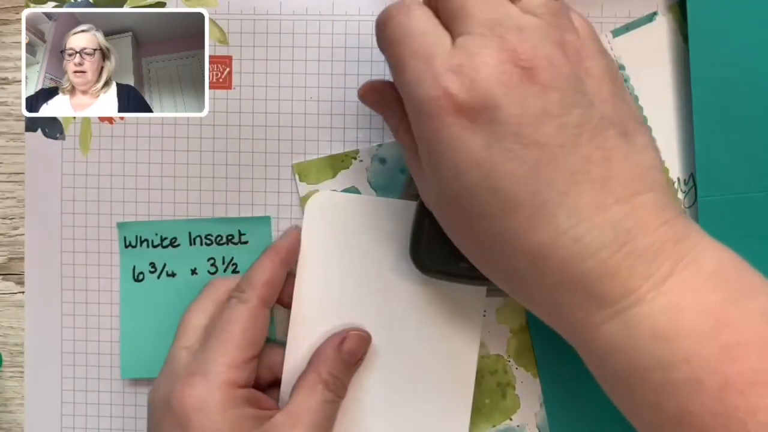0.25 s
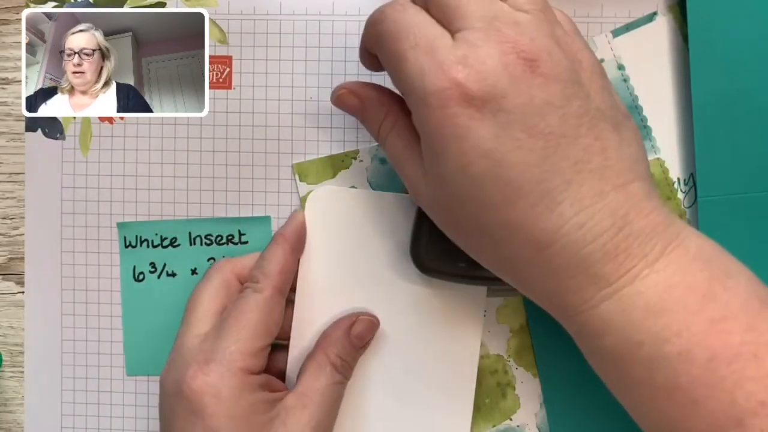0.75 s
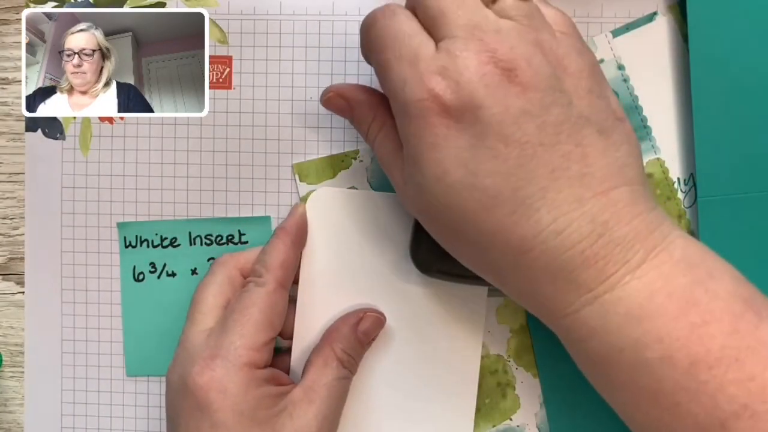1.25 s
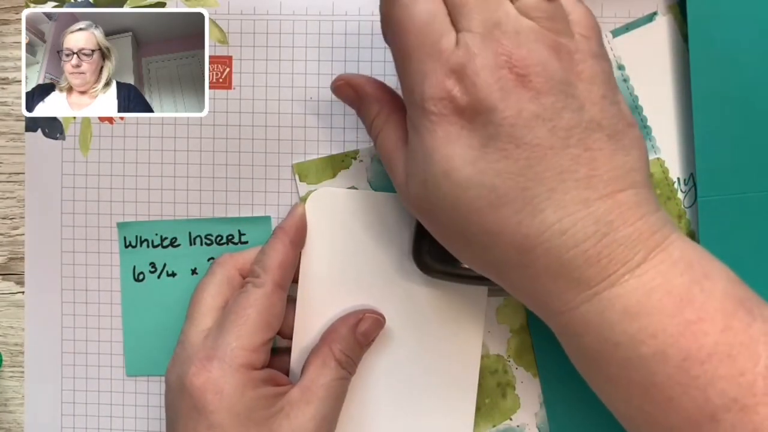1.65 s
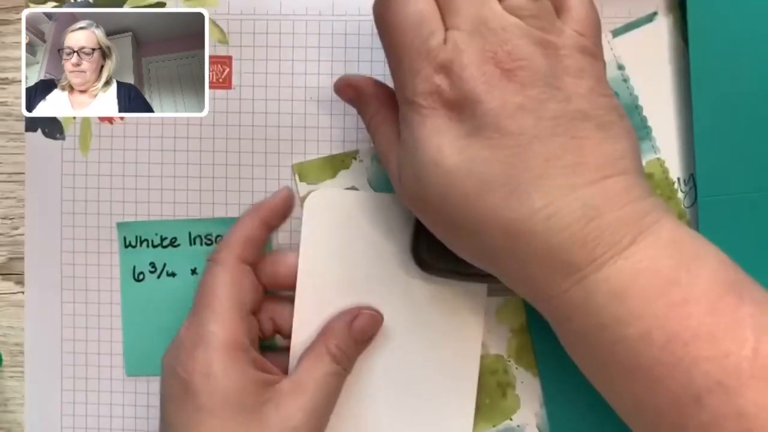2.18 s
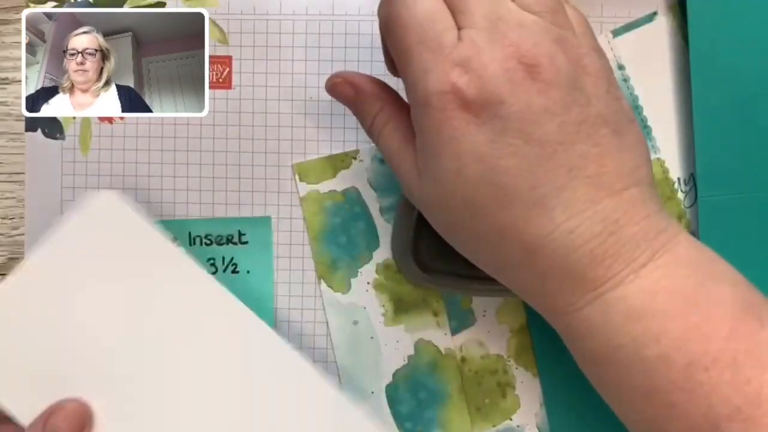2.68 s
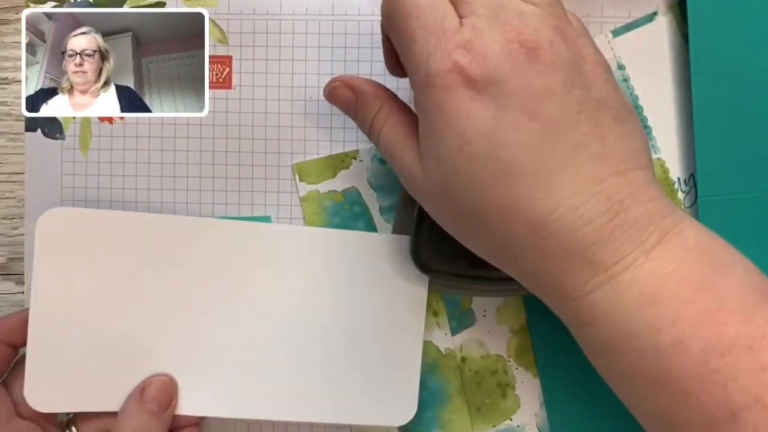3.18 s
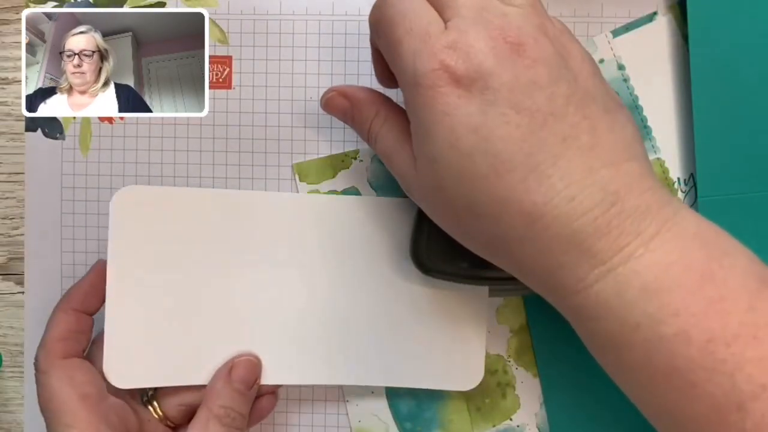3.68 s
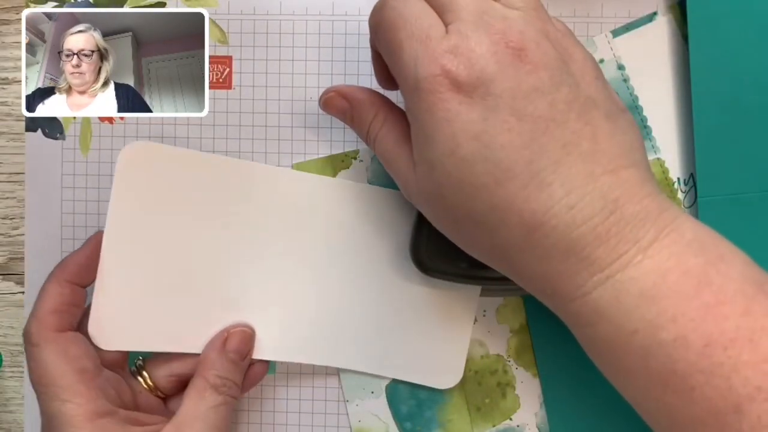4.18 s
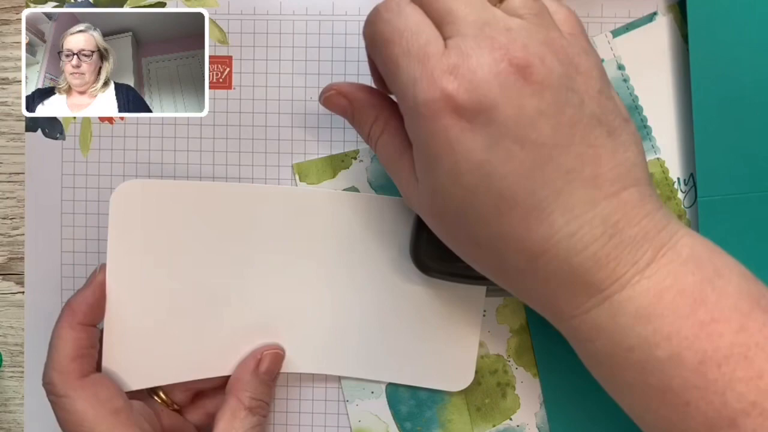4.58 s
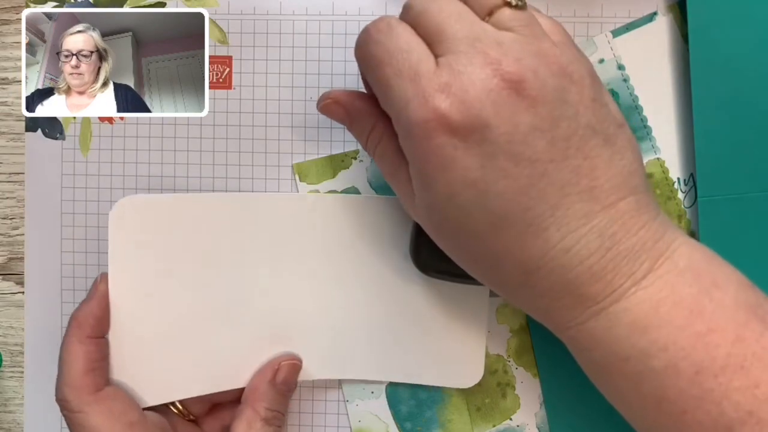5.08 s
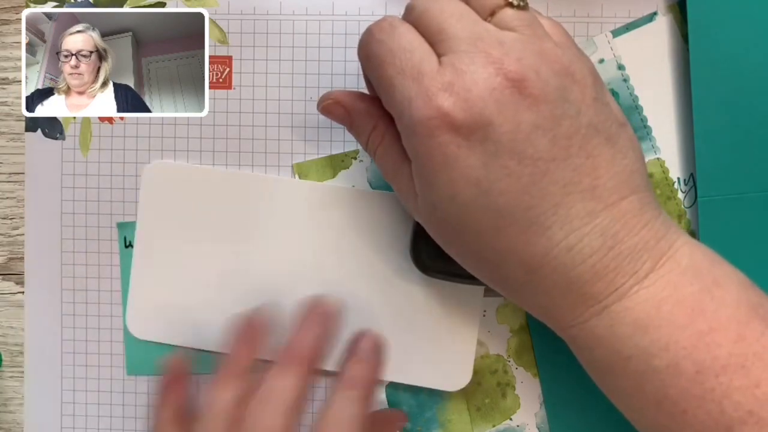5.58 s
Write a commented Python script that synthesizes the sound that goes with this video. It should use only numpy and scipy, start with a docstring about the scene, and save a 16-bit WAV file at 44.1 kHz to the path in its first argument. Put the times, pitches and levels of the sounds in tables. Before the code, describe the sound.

A corner punch snaps hard through card on a desk, then the card rustles, clicks into place again and is let go.

```python
"""A hand corner punch snaps through card stock on a craft table, heard close up in a small quiet room.
Base, shell and die ring as decaying sines with noisy cracks; the table thuds and hums on.
Stick-slip jerks make the lever creak around the cut; damped noise knocks make its ticks and the card's taps.
The card is drawn out and turned as grainy filtered noise, clicks into the slot for the next corner,
then slides and is let go with a falling scrape. Knocks get a short echo, over a steady hush."""
import sys
import numpy as np
from scipy import signal
from scipy.fft import rfft, irfft, next_fast_len
from scipy.io import wavfile
from scipy.ndimage import uniform_filter1d

SR = 44100
rng = np.random.default_rng(int(sys.argv[2]) if len(sys.argv) > 2 else 0)


def pcm_store(signal):
    """Save signal as 16-bit PCM."""
    levels = np.round(np.clip(np.atleast_2d(signal), -1, 1) * 32767)
    wavfile.write(sys.argv[1], SR, levels.astype(np.int16).T)


N = 257588
TIME = np.arange(N) / SR  # seconds
TOP_HZ = 15900  # upper limit of the whole sound

# the snap: cracking card, breakthrough, blade on its stop
# (t/s, base level/dB, plastic shell level/dB, steel level/dB, crack level/dB, crack t60/s)
SNAP_STAGES = [(1.788, -42.5, -27, -58.5, -30.5, 0.013), (1.7917, 0.5, -23.5, -50, -30, 0.0043),
               (1.7928, -37.5, -18, -38, -20, .014), (1.7959, -38.5, -12.5, -33.5, -15.5, .008),
               (1.7967, -7, -25.5, -42, -22.5, 0.009), (1.8097, -43, -33.5, -30.5, -14.5, 0.015),
               (1.8109, -11, -25.5, -24.5, -18.5, 0.014), (1.8144, -16.5, -31.5, -36, -26, 0.018)]
# modes of the punch on its mat, its shell, its steel die and the table top (f/Hz, level/dB, t60/s)
BASE_MODES = [(163.6, -13.5, 0.11), (192.5, -8, .15), (192.65, -6.5, 0.17), (254, -6, 0.11),
              (322.7, -5, 0.1), (392.3, -19, 0.14), (494, -15, 0.13), (470, -23, 0.054)]
SHELL_MODES = [(694, -0.5, 0.039), (960, -5.5, 0.015), (1384, -4.5, 0.039), (1502, -7, .05),
               (1770, -6, 0.072), (2150, -6.5, .025), (2956, -3.5, 0.026), (3160, -11.5, .03),
               (4450, -13, 0.018)]
STEEL_MODES = [(538, -3.5, 0.1), (788, -3, .1), (835, -5.5, 0.13), (905, -2, 0.061), (950, -16, .42),
               (1082, -15.5, 0.21), (1460, -6.5, 0.066), (1553, -10.5, .09), (2150, -16, .1),
               (3920, -4, 0.052), (3910, -10.5, 0.05), (6331.5, -1, 0.036), (6481, -12, .08),
               (6940, -14, .09), (6600, -11, 0.028)]
TABLE_MODES = [(71.5, -27, .24), (75, -20, 0.06), (106.4, 2.5, 0.079), (120.79, -7, 0.038)]
# the table takes the weight of the hand or the card (t/s, level/dB)
TABLE_THUMPS = [(1.197, -42.5), (1.2158, -52), (1.8058, -16.5), (1.8229, -8.5), (1.8983, -29.5),
                (2.133, -64), (2.19, -43.5), (2.385, -41.5), (3.788, -40), (4.727, -52.5), (5.31, -51),
                (5.366, -42.5)]
# cracking card (f/Hz, level per Hz/dB)
CRACK_SPECTRUM = [(300, -10), (700, 4.5), (1300, 0), (2000, 2), (3000, -1.5), (3900, 0.5), (5000, -3),
                  (6500, 0), (8000, -1), (10500, -2.5), (13500, -9), (16000, -13)]
# low, faint modes of the loaded table (f/Hz, level/dB, t60/s)
AFTER_MODES = [(69, -59.5, 6.2), (99, -55.5, 4.8), (320, -55.5, 3.3)]
HUM_HZ, BEAT_HZ = 204.2, 2.27

# the punch creaks as its load shifts: palm settles, lever is pressed, recoils, is let up
# (start t/s, hold/s, groan level/dB, crackle level/dB)
CREAK_EVENTS = [(1.284, 0.036, -51, -71), (1.51, .015, -56.5, -61), (1.54, .08, -59, -70.5),
                (1.651, 0.11, -40, -47), (1.838, 0.017, -37, -44.5), (1.92, .03, -50.5, -60.5),
                (1.98, 0.11, -59.5, -64), (2.141, 0.0066, -41, -53), (2.197, 0.013, -44.5, -53),
                (2.363, .015, -49, -53.5), (2.722, 0.053, -63, -68)]
CREAK_ATTACK_S, CREAK_RELEASE_S = 0.022, 0.037  # time constants
# the base groaning on its mat, then the crackling hinge (f/Hz, level per Hz/dB)
GROAN_SPECTRUM = [(55, -16.5), (100, -9), (140, -4.5), (190, -3.5), (275, 1), (380, -11.5), (520, -17),
                  (900, -50)]
CRACKLE_SPECTRUM = [(300, -21), (450, -1.5), (580, 3.5), (680, -4), (830, 6.5), (1050, -11), (1500, -10),
                    (2200, -16.5), (3800, -24), (5500, -46)]

# the card corner meets the guide, then seats against the die
# (t/s, corner level/dB, guide level/dB, crack level/dB, crack t60/s)
SEATING_CONTACTS = [(3.695, -26, -73, -52, 0.0066), (3.6964, -34.5, -73.5, -57.5, .008),
                    (3.6966, -32.5, -74.5, -57, 0.013), (3.7759, -59.5, -54, -30.5, 0.011),
                    (3.776, -23.5, -43, -24, 0.02)]
# modes of the card corner and of the guide in the die (f/Hz, level/dB, t60/s)
CORNER_MODES = [(509, -25, 0.0258), (1020, -16, 0.011), (1900, -6, 0.013), (2150, 1, 0.006),
                (2800, 2.5, 0.0038), (3550, 0, 0.0041), (4117, 0, 0.008), (4200, -38.5, 0.071),
                (4640, -8, 0.0052), (5700, -17.5, 0.0087)]
GUIDE_MODES = [(333, -3, 0.04), (2780, 5.5, 0.046), (3110, 21.5, 0.0058), (3700, 18, 0.019),
               (3450, -4.5, 0.11), (3450, -2, 0.097), (3620, -12, .09), (3690, 2, 0.14), (7000, 0.5, 0.071),
               (7900, -1.5, 0.11), (8500, -8.5, .06), (9000, -8, 0.098)]

# ticks of the lever and its hinge; a higher tilt sounds harder (t/s, level/dB, tilt/dB per octave)
LEVER_TICK_EVENTS = [(0.5323, -50, 4), (0.5613, -55, 0), (1.2584, -47.5, 4), (1.297, -59, -4),
                     (1.4762, -53.5, -3), (1.4928, -59, -5), (1.5059, -54, -5.5), (1.5957, -44, -2.5),
                     (1.626, -45, -3.5), (1.654, -48, -10), (1.689, -42.5, 1), (1.72, -44.5, -5.5),
                     (1.7498, -38, 4.5), (2.0075, -42, -4), (2.0309, -52.5, -3), (2.1862, -39, 1.6),
                     (2.214, -47.5, 5), (2.293, -48, 8)]
# taps of the card against punch, fingers and table (t/s, level/dB, tilt/dB per octave)
CARD_TAP_EVENTS = [(1.4484, -65, 3), (2.3741, -58.5, 4), (2.3816, -50, -6), (2.42, -58.5, -12),
                   (2.7217, -60.5, -7.5), (2.7567, -61.5, 3.5), (3.0313, -61.5, -6.5), (3.464, -59, -5),
                   (4.438, -65.5, 2), (4.7154, -59, 2), (5.0283, -62.5, 0.5), (5.3039, -55.5, -1.5),
                   (5.3316, -49, -1.5), (5.3661, -45, -1), (5.4536, -66, 3.5)]
# the bands in which a knock rings (low f/Hz, high f/Hz)
KNOCK_BANDS = [(170, 450), (640, 1120), (1250, 3200), (4000, 11000)]
# how lever and card answer a knock, one row per band (relative level/dB, t60/s)
LEVER_ANSWER = [(-9.5, .081), (0.5, 0.022), (-6.5, .014), (-28.5, .01)]
CARD_ANSWER = [(-7, 0.092), (0.06, 0.036), (-1, 0.016), (-7.5, 0.015)]
TILT_PIVOT_HZ = 850

# strokes of the card: lined up, drawn out, turned, fed in, nudged, let go, smoothed
# (start t/s, hold/s, rub level/dB, hiss level/dB), both levels before trim and flutter
CARD_STROKES = [(0, .13, -64, -69.5), (0.544, 0.032, -66.5, -67.5), (0.771, .06, -64, -75),
                (2.15, 0.089, -63, -62), (2.276, 0.087, -61, -62), (2.613, 0.034, -64.5, -62.5),
                (2.77, .03, -66, -62.5), (3.307, 0.18, -59, -65), (3.95, 0.0222, -63, -69.5),
                (4.16, 0.076, -63, -71.5), (4.425, 0.028, -63, -73.5), (4.73, 0.12, -62.5, -68),
                (5.292, 0.053, -53, -53.5), (5.387, 0.033, -51.5, -66), (5.683, .16, -67.5, -65.5)]
# time constants of a stroke at the reference level; louder is brisker, halving them every BRISK_DB
STROKE_ATTACK_S, STROKE_RELEASE_S, STROKE_REF_DB, BRISK_DB = 0.054, 0.041, -60.5, 8
# rubbing sheet, then hissing edge (f/Hz, level per Hz/dB)
RUB_SPECTRUM = [(70, -16.5), (140, 0), (280, 0), (520, -1.5), (850, -1.5), (1150, -5.5), (1500, -0.5),
                (2100, -4), (2900, -3.5), (3800, -11), (6000, -30.5)]
HISS_SPECTRUM = [(2000, -33.5), (3400, 0), (4200, -2.5), (5100, -2), (6400, -3), (8000, -2.5), (9500, -5.5),
                 (11000, -5), (13600, -8.5), (15500, -13)]
# the bent sheet scrapes off the finger and its note falls (t/s, f/Hz, level/dB)
SCRAPE_GLIDE = [(5.29, 2397, -73), (5.336, 2070, -48.5), (5.356, 1880, -76), (5.376, 1578, -41),
                (5.39, 1470, -48), (5.405, 1506, -55), (5.44, 1440, -78)]

# the room's echo; a band reaches up to the next row's edge (lower edge f/Hz, level/dB, t60/s)
ROOM_BANDS = [(60, -22.5, .4), (400, -10.5, 0.097), (1120, -7, .22), (4000, -6, .21), (8956, -4, 0.15)]
# the steady hush (f/Hz, level per Hz/dB)
HUSH_SPECTRUM = [(18, -40), (30, -15.5), (77, 1), (156, -1), (208, -1), (307, -1.5), (639, -10.5),
                 (1110, -13.5), (1720, -11.5), (2130, -15), (2830, -13.5), (4910, -17), (8720, -19.5),
                 (13600, -25.5), (15500, -34.5)]


def punch(crack, clang_db=-9, clang_t60=0.09):
    """Each stage of the cut rings base, shell and die; the table top takes its own thumps."""
    out = np.zeros(N)
    base, shell = ring(BASE_MODES), ring(SHELL_MODES)
    steel, table = ring(STEEL_MODES), ring(TABLE_MODES)
    for s, base_db, shell_db, steel_db, crack_db, crack_t60 in SNAP_STAGES:
        # the die's many high modes blur into a noisy clang
        die = steel + undb(clang_db) * burst(crack, clang_t60)
        body = undb(base_db) * base + undb(shell_db) * shell + undb(steel_db) * die
        add(out, s, body + undb(crack_db) * burst(crack, crack_t60))
    for s, db in TABLE_THUMPS:
        add(out, s, undb(db) * table)
    return out


def spring(db=-55, t60=0.58):
    """The return spring shimmers after the cut: a dying burst of mid-band noise."""
    out = np.zeros(N)
    shimmer = unit(band(rng.standard_normal(N), 900, 3800))
    add(out, SNAP_STAGES[-1][0], undb(db) * burst(shimmer, t60))
    return out


def after_ring(hum_db=-51, hum_t60=7.5):
    """The table rings on after the blow, and something springy on it hums with a slow beat."""
    t = np.maximum(TIME - SNAP_STAGES[1][0], 0)  # seconds since breakthrough
    beat = np.cos(np.pi * BEAT_HZ * t)
    hum = undb(hum_db - 60 * t / hum_t60) * np.sin(2 * np.pi * HUM_HZ * t) * beat
    table = np.zeros(N)
    for hz, db, t60 in AFTER_MODES:
        decay = np.exp(-np.log(1000) * t / t60)
        table += undb(db) * decay * np.sin(2 * np.pi * hz * t)
    return hum + table * flutter(per_s=7.5, depth_db=6.5)


def creak():
    """Loaded plastic slips in small jerks: the base groans on the mat and the hinge crackles."""
    groan_gain = crackle_gain = 0
    for s, hold, groan_db, crackle_db in CREAK_EVENTS:
        load = swell(s, hold, CREAK_ATTACK_S, CREAK_RELEASE_S)
        groan_gain = np.maximum(groan_gain, undb(groan_db) * load)
        crackle_gain = np.maximum(crackle_gain, undb(crackle_db) * load)
    groan = colour(slips(per_s=2300, spread_db=2), GROAN_SPECTRUM)
    hinge = slips(per_s=960, spread_db=0.5) + 0.44 * rng.standard_normal(N)
    crackle = colour(hinge, CRACKLE_SPECTRUM)
    return groan * groan_gain + crackle * crackle_gain


def seating(crack, low_hz=1300):
    """Two sharp clicks as the next corner enters the slot; the thin edge radiates little bass."""
    out, corner, guide = np.zeros(N), ring(CORNER_MODES), ring(GUIDE_MODES)
    edge = band(crack, low_hz, TOP_HZ)
    for s, corner_db, guide_db, crack_db, crack_t60 in SEATING_CONTACTS:
        modes = undb(corner_db) * corner + undb(guide_db) * guide
        add(out, s, modes + undb(crack_db) * burst(edge, crack_t60))
    return out


def taps(events, answer):
    """Light, well damped knocks on one object, as noise in bands; the lows linger longest."""
    out = np.zeros(N)
    head = int(0.008 * SR)
    for (lo, hi), (band_db, t60) in zip(KNOCK_BANDS, answer):
        shape = fade(t60)[:SR // 10]
        octaves = np.log2(np.sqrt(lo * hi) / TILT_PIVOT_HZ)
        noise = rng.standard_normal((len(events), len(shape)))
        knocks = band(noise * shape, lo, hi)
        for (s, db, tilt), knock in zip(events, knocks):
            gain = undb(db + band_db + tilt * octaves)
            # a knock's level is that of its first few milliseconds
            add(out, s, gain * knock / np.std(knock[:head]))
    return out


def card(rub_trim_db=-2.0, hiss_trim_db=-0.99):
    """Paper fibres catch and slip: a grainy rub from the sheet and a finer hiss from its edge."""
    rub_gain = hiss_gain = 0
    for s, hold, rub_db, hiss_db in CARD_STROKES:
        slowness = 2 ** ((STROKE_REF_DB - max(rub_db, hiss_db)) / BRISK_DB)
        speed = swell(s, hold, STROKE_ATTACK_S * slowness, STROKE_RELEASE_S * slowness)
        rub_gain = np.maximum(rub_gain, undb(rub_db + rub_trim_db) * speed)
        hiss_gain = np.maximum(hiss_gain, undb(hiss_db + hiss_trim_db) * speed)
    rub = colour(slips(per_s=9000, spread_db=2.0), RUB_SPECTRUM) * rub_gain
    hiss = colour(slips(per_s=20000, spread_db=4.0), HISS_SPECTRUM) * hiss_gain
    # the uneven hand
    return (rub + hiss) * flutter(per_s=55, depth_db=4.0)


def scrape(width_hz=110):
    """Coarse slips ring one resonance of the sheet, which sinks overall as the sheet unbends."""
    s, hz, db = np.transpose(SCRAPE_GLIDE)
    turn = np.exp(2j * np.pi * np.cumsum(np.interp(TIME, s, hz)) / SR)
    # shift the gliding note down to zero, keep what lies near it, shift it back up
    lowpass = signal.butter(2, width_hz, fs=SR, output="sos")
    held = signal.sosfilt(lowpass, slips(per_s=540, spread_db=3.5) / turn)
    return unit((held * turn).real) * np.interp(TIME, s, undb(db), 0, 0)


def room(x, build_s=0.0018):
    """Nearby surfaces return a short diffuse echo, each band dying at its own rate."""
    edges = [row[0] for row in ROOM_BANDS] + [TOP_HZ]
    echo = 0
    for (lo, db, t60), hi in zip(ROOM_BANDS, edges[1:]):
        tail = burst(band(rng.standard_normal(N), lo, hi), t60)
        tail = tail * (1 - np.exp(-(TIME[:len(tail)] / build_s) ** 2))  # soft onset
        echo = echo + undb(db) * tail / np.sqrt(np.sum(fade(t60) ** 2))
    return signal.fftconvolve(x, echo)[:N]


def hush(db=-65):
    """The quiet room as steady coloured noise."""
    return undb(db) * colour(rng.standard_normal(N), HUSH_SPECTRUM)


def ring(modes):
    """Decaying sines of a struck body; neighbouring modes swing opposite ways."""
    t = TIME[:SR // 2]
    out = np.zeros(len(t))
    for k, (hz, db, t60) in enumerate(modes):
        out += (-1) ** k * undb(db) * fade(t60) * np.sin(2 * np.pi * hz * t)
    return out


def burst(noise, t60):
    """A random stretch of noise, struck and dying away, its colour kept even so no pitch stands out."""
    shape = fade(t60)
    start = rng.integers(N - len(shape))
    piece = noise[start:start + len(shape)]
    struck = rfft(piece * shape)
    wanted = uniform_filter1d(np.abs(rfft(piece)), size=61) + 1e-9
    got = uniform_filter1d(np.abs(struck), size=61) + 1e-9
    evened = irfft(struck * wanted / got)
    return evened * (TIME[:len(shape)] < 0.4) * np.sqrt(np.mean(shape ** 2))


def slips(per_s, spread_db):
    """Stick-slip: tiny jerks at random moments and of uneven size, at rms 1."""
    moments = rng.random(N) < per_s / SR
    sizes = rng.standard_normal(N) * undb(spread_db * rng.standard_normal(N))
    return unit(moments * sizes)


def swell(start, hold, attack, release):
    """A gain that rises to 1 at start, holds, and dies away (all in seconds)."""
    rise = np.minimum(TIME - start, 0) / attack
    fall = np.maximum(TIME - start - hold, 0) / release
    return np.exp(rise - fall)


def flutter(per_s, depth_db):
    """An uneven gain that wanders at random between knots."""
    knots = np.arange(int(N / SR * per_s) + 2) / per_s
    return undb(depth_db * np.interp(TIME, knots, rng.standard_normal(len(knots))))


def colour(x, spectrum):
    """Give a steady sound a spectrum, at rms 1."""
    hz, db = np.transpose(spectrum)
    size = next_fast_len(N, real=True)
    bins = np.maximum(np.arange(size // 2 + 1) * SR / size, 1)
    gain = undb(np.interp(np.log(bins), np.log(hz), db))
    return unit(irfft(rfft(x, size) * gain, size)[:N])


def band(x, lo_hz, hi_hz):
    """Causal band-pass."""
    sos = signal.butter(2, [lo_hz, min(hi_hz, TOP_HZ)], "band", fs=SR, output="sos")
    return signal.sosfilt(sos, x)


def fade(t60):
    """A ring-down falling 60 dB in t60 seconds, cut at half a second."""
    return np.exp(-np.log(1000) * TIME[:SR // 2] / t60)


def undb(db):
    """Decibels to gain."""
    return 10 ** (np.asarray(db) / 20)


def unit(x):
    """Scale to rms 1."""
    return x / np.sqrt(np.mean(x ** 2))


def add(out, s, sound):
    """Mix a sound in from time s."""
    i = int(round(s * SR))
    out[i:i + len(sound)] += sound[:N - i]


def scene(click_echo_db=-5, tap_echo_db=3.5):
    """Punch and card over a steady hush; snap, clicks and knocks also feed the room's echo."""
    crack = colour(rng.standard_normal(N), CRACK_SPECTRUM)
    snap, clicks = punch(crack), seating(crack)
    knocks = taps(LEVER_TICK_EVENTS, LEVER_ANSWER) + taps(CARD_TAP_EVENTS, CARD_ANSWER)
    echo = room(snap + undb(click_echo_db) * clicks + undb(tap_echo_db) * knocks)
    struck = snap + clicks + knocks + echo
    rubbed = creak() + card() + scrape()
    return (struck + rubbed + spring() + after_ring() + hush())[None]


def record(dry):
    """Drop the deepest bass and cut the top steeply."""
    bass_cut = signal.butter(4, 52, "high", fs=SR, output="sos")
    top_cut = signal.ellip(10, 0.2, 80, TOP_HZ, fs=SR, output="sos")
    return signal.sosfilt(top_cut, signal.sosfilt(bass_cut, dry))


dry = scene()
out = record(dry)
pcm_store(out)
```